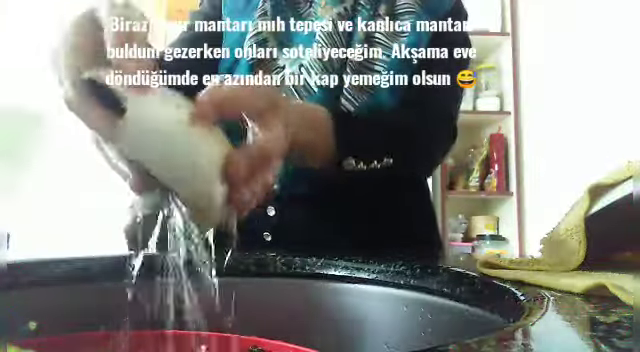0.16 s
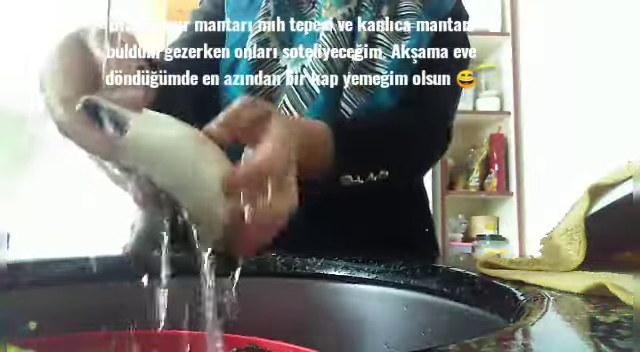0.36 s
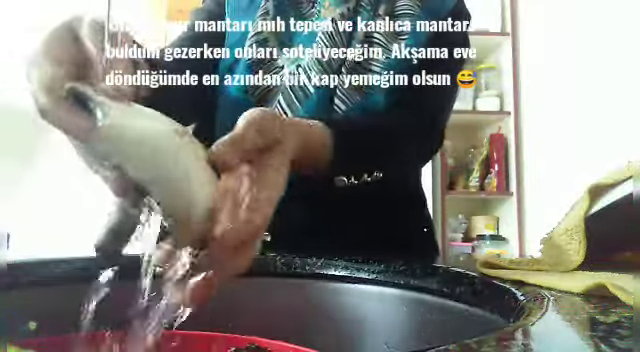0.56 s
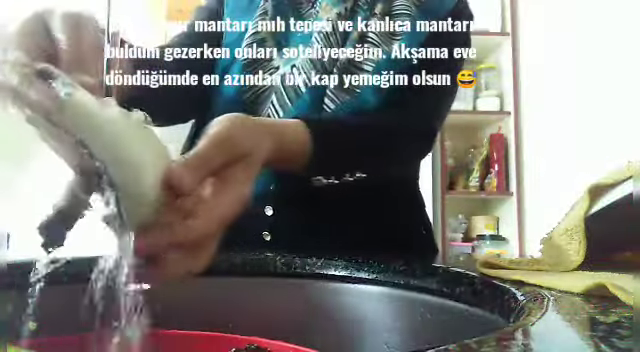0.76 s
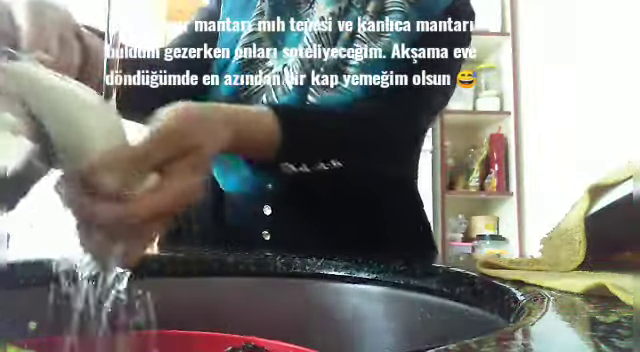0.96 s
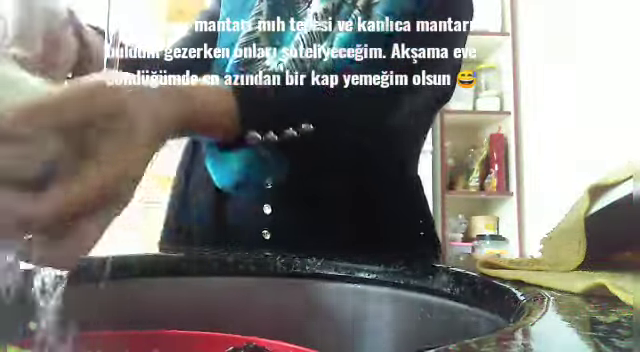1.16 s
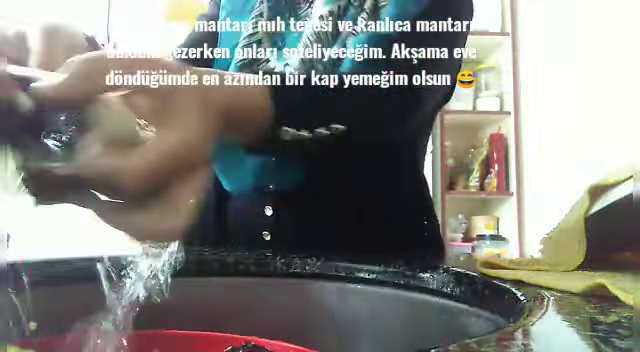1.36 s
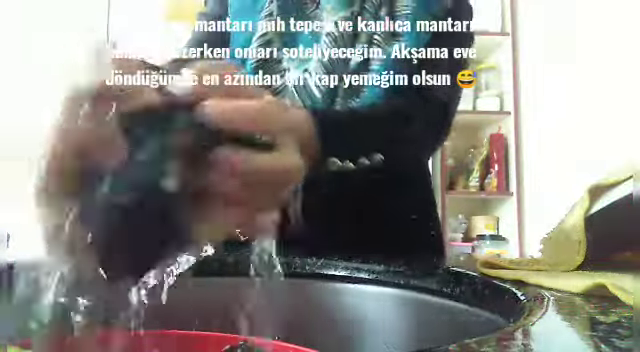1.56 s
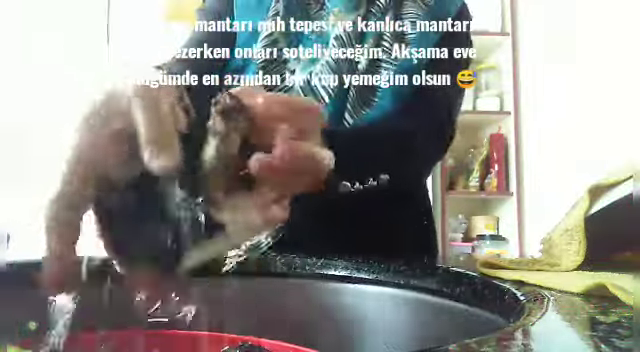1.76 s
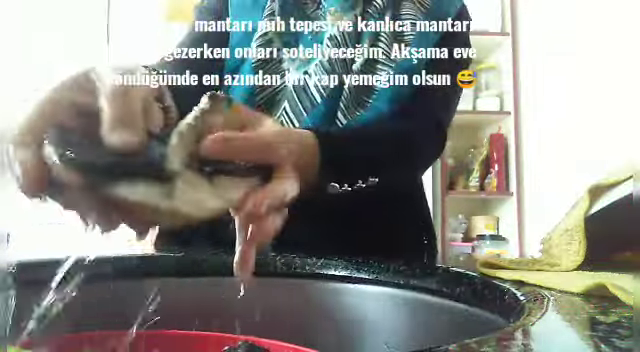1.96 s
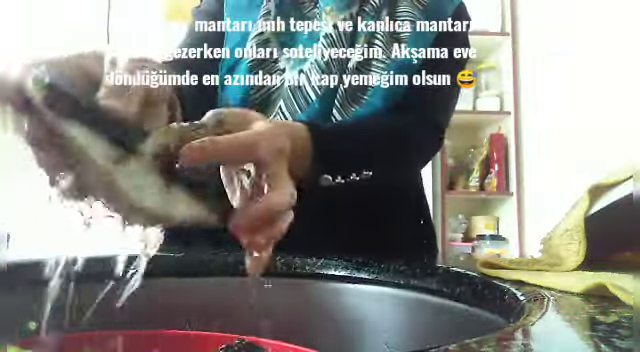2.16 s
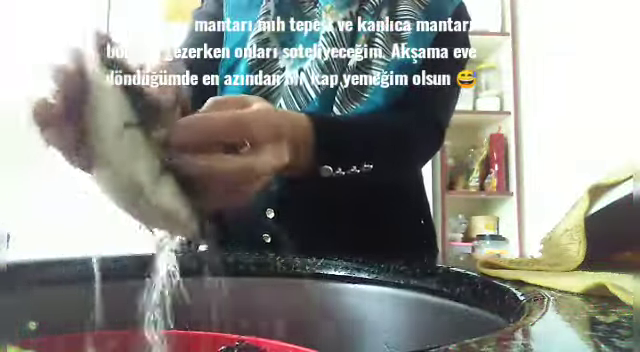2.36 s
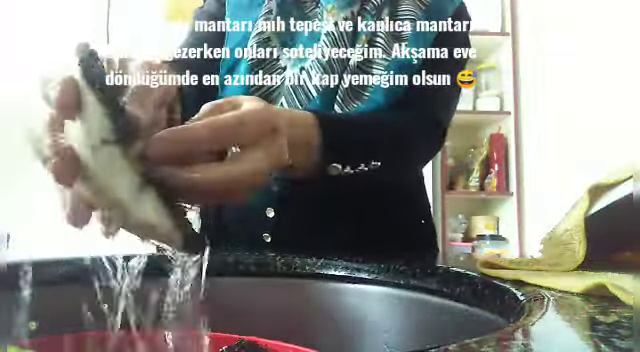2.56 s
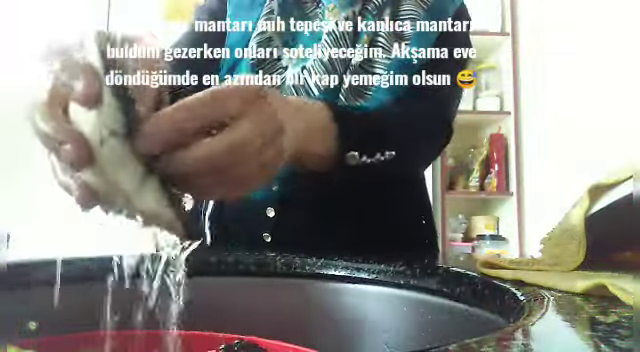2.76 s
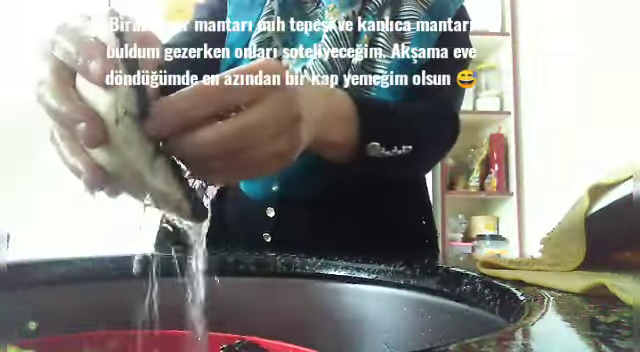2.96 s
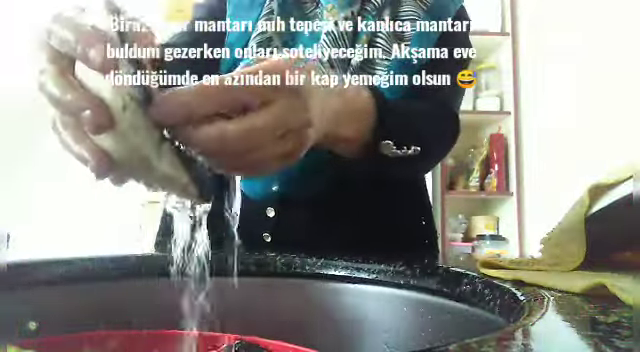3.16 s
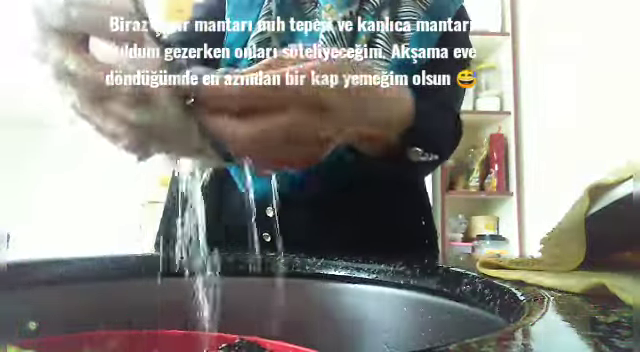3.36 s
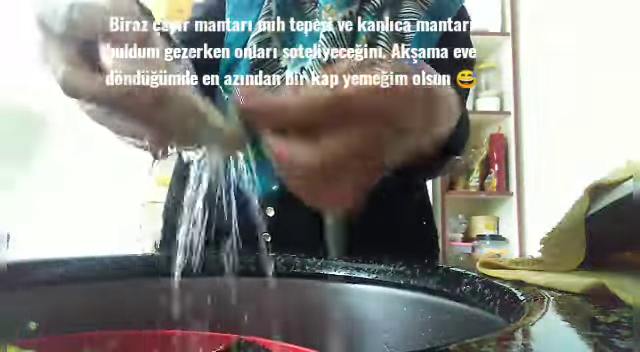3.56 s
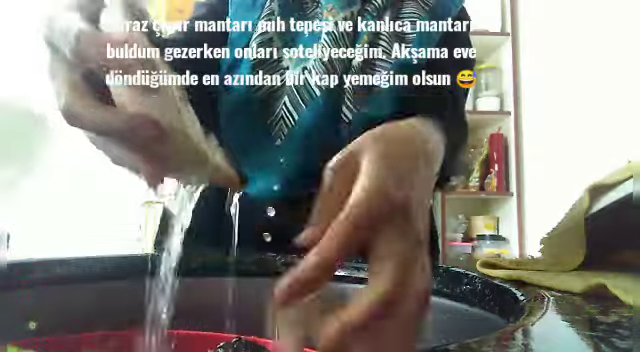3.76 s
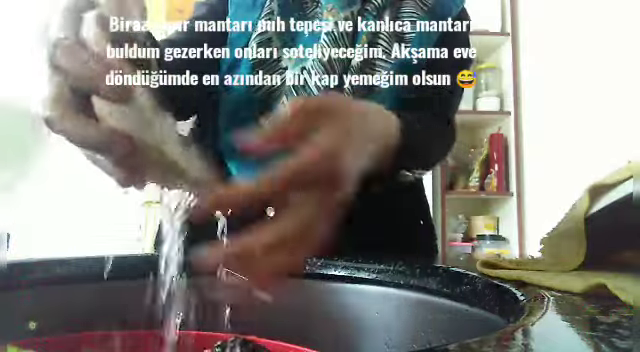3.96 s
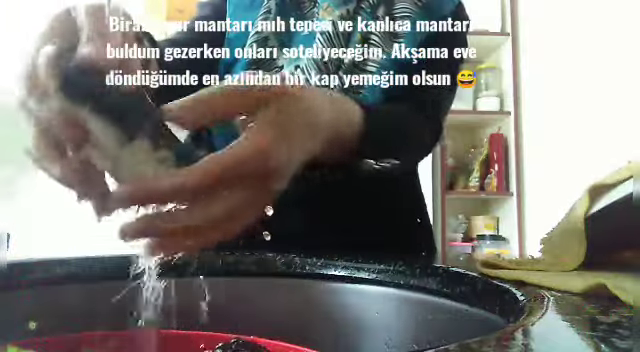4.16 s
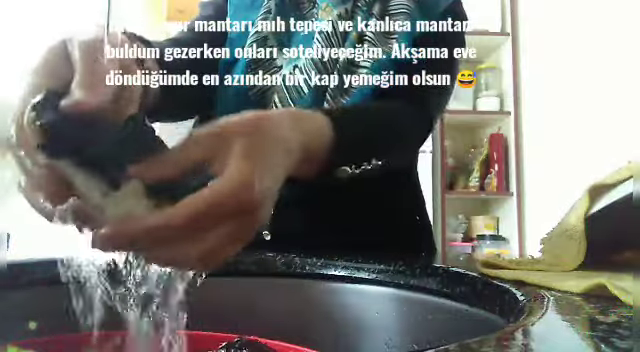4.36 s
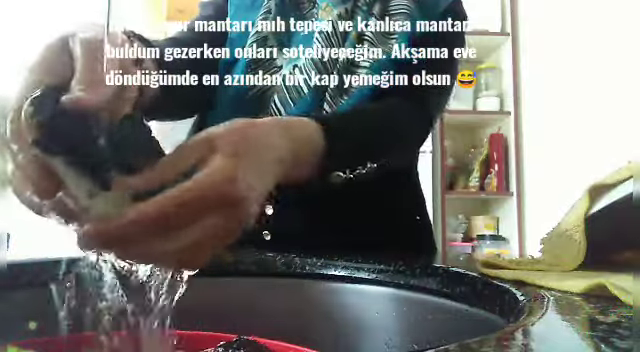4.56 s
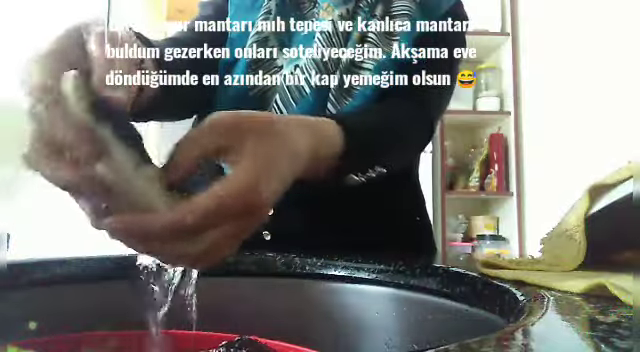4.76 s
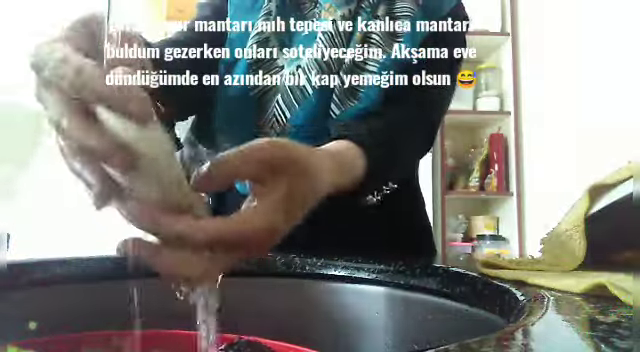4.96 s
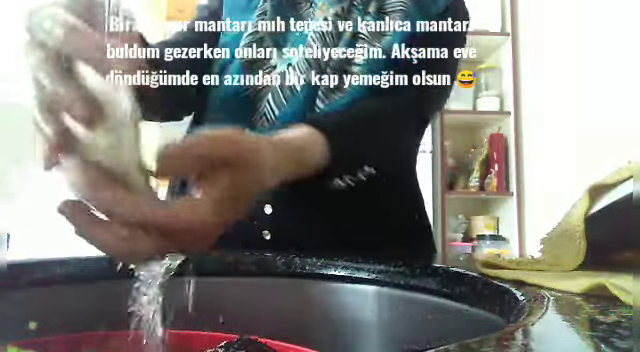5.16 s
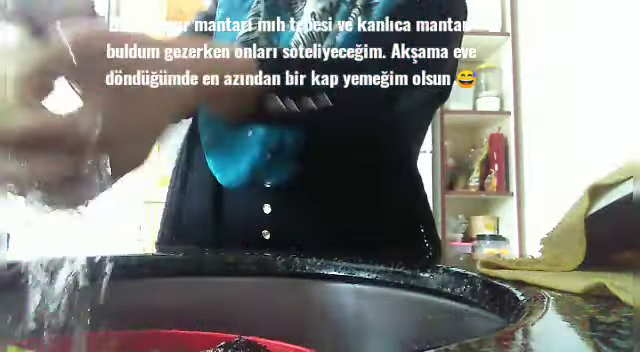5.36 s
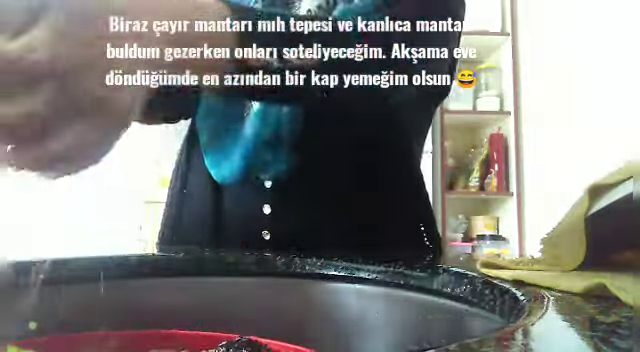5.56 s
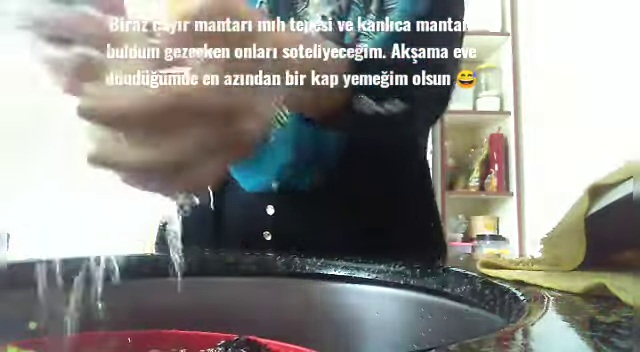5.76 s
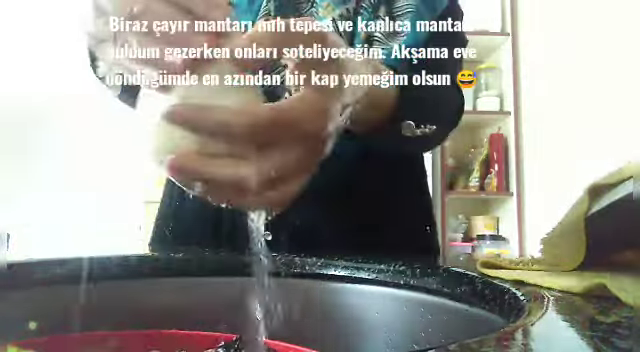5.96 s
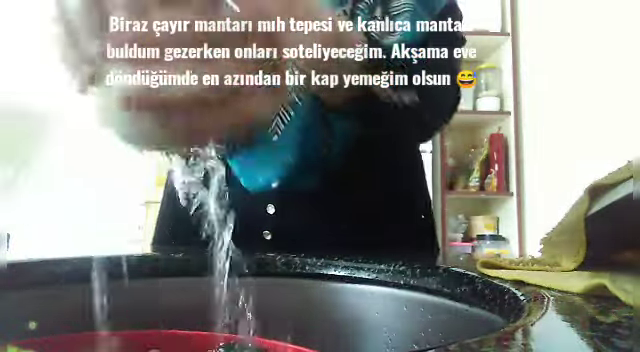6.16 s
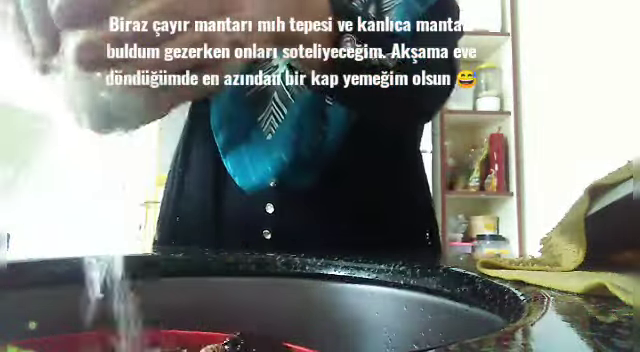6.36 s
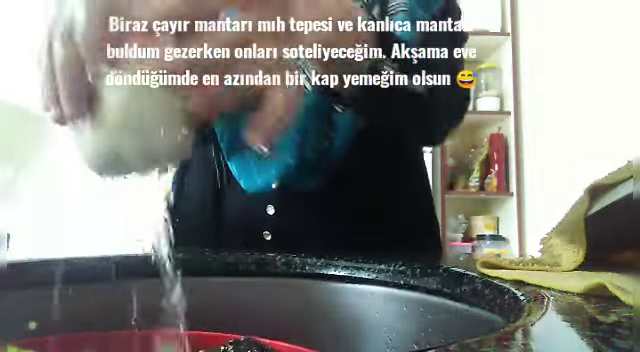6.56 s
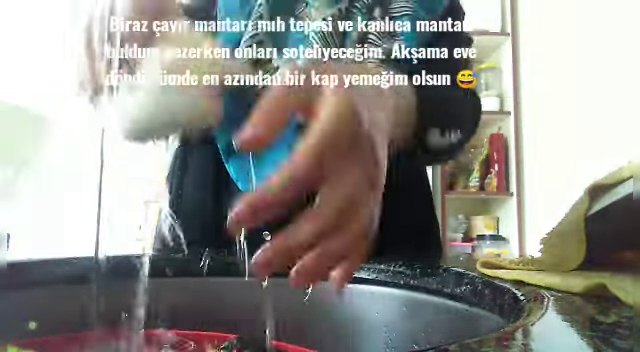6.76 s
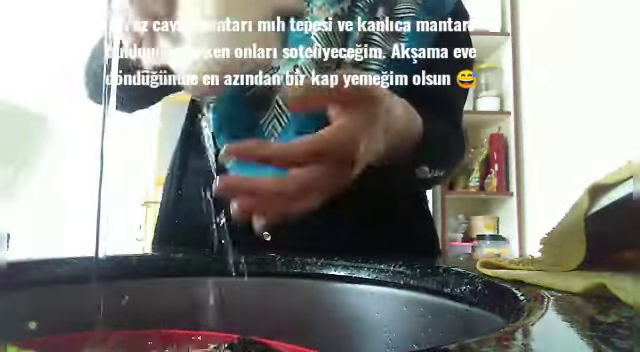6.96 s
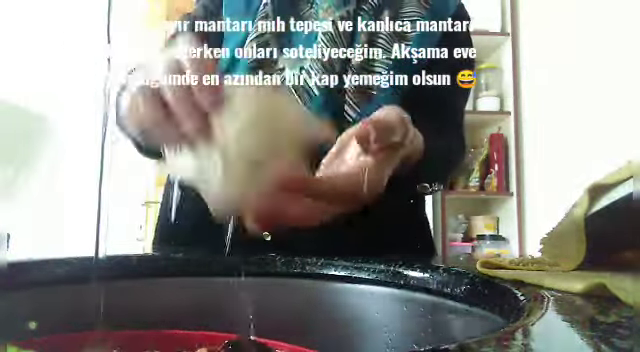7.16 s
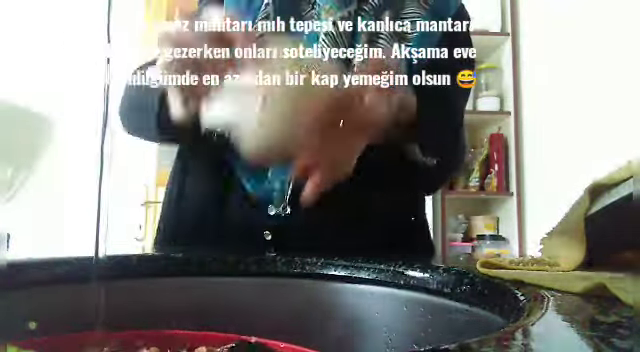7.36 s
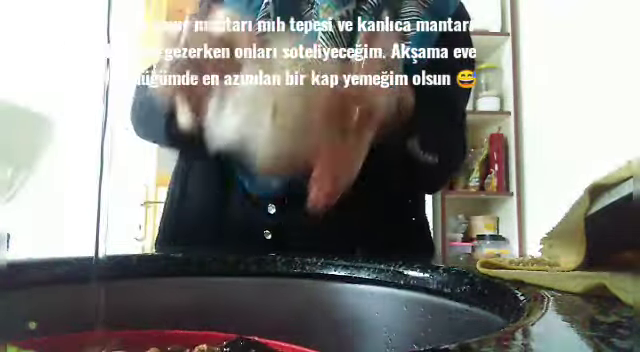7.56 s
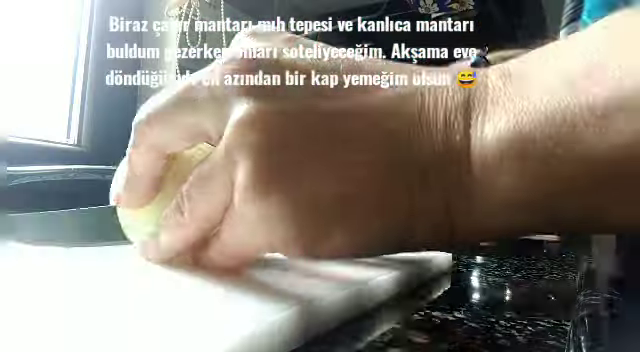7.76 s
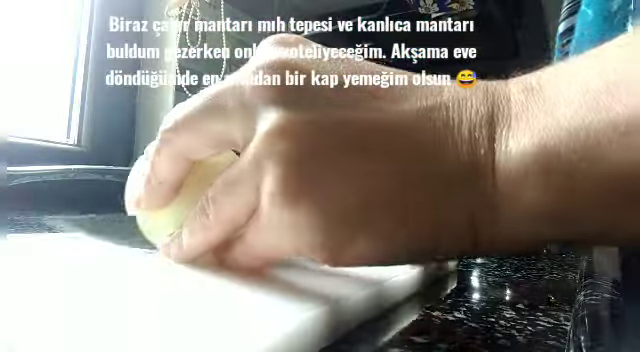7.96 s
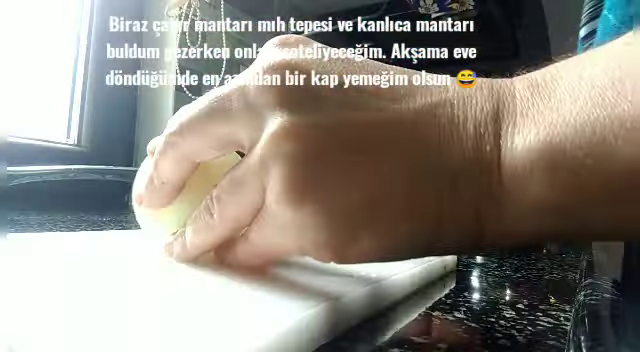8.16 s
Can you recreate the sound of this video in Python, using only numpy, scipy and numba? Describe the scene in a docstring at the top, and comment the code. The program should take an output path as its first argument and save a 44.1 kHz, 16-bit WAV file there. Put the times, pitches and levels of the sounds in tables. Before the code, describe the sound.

A kitchen tap runs over a mushroom being rinsed by hand above a bowl in the sink. Fine hissing spray and pattering run-off are broken by sharp splats, fat drops and ringing bubble plops, busiest around four seconds and again before seven. The flow then thins to drips and stops, leaving a very faint moist knife cut over a low thrum. Close stereo microphone, small room.

```python
"""In a kitchen sink, tap water runs over a mushroom turned in the hands and falls into a bowl.
The jet sprays and the run-off patters, as showers of tiny chirps over noise; the bowl drums in low noise.
Gouts, lumps and drops are bursts of band noise; trapped bubbles are dying sines; sink and kitchen ring on.
The flow dies away, and a knife starts to slice a vegetable: grainy noise and snaps over a soft low thrum."""
import sys
import numpy as np
from scipy import signal
from scipy.fft import rfft, irfft, next_fast_len
from scipy.io import wavfile
from scipy.ndimage import uniform_filter1d
from numba import njit

SR = 44100
rng = np.random.default_rng(int(sys.argv[2]) if len(sys.argv) > 2 else 0)


def log_audio(samples):
    """Write samples as a 16-bit WAV file to the path given in sys.argv[1]."""
    # one column per channel
    frames = np.atleast_2d(samples).T
    # limit to full scale, then quantise
    limited = np.clip(frames, -1, 1)
    pcm = np.round(limited * 32767).astype(np.int16)
    wavfile.write(sys.argv[1], SR, pcm)


N = 361619
TIME = np.arange(N) / SR
SPLAT_T60_S = 0.064  # decay of stray splashes and of a middling gout


def undb(db):
    """Decibels to gain."""
    return np.exp(np.asarray(db) * (np.log(10) / 20))


def unit(x):
    """Scale to rms 1."""
    return x / np.sqrt(np.mean(x ** 2) + 1e-18)


def curves(table):
    """The columns of a timed table, drawn as straight lines sample by sample."""
    seconds, *columns = np.transpose(table)
    return [np.interp(TIME, seconds, column) for column in columns]


def fade(t, t60):
    """Exponential decay that loses 60 dB in t60 seconds."""
    return np.exp(-np.log(1000) * t / t60)


def gains(points, size):
    """A (Hz, dB) curve as gains on the bins of a transform, interpolated over log frequency."""
    hz, db = np.transpose(points)
    bin_hz = np.fft.rfftfreq(size, 1 / SR) + 1
    return undb(np.interp(np.log(bin_hz), np.log(hz), db))


def colour(x, points):
    """Equalise a sound with a (Hz, dB) curve."""
    size = next_fast_len(x.shape[-1] + 2048)
    return irfft(rfft(x, size) * gains(points, size), size)[..., :x.shape[-1]]


def octave_band(x, hz, octaves):
    """A smooth band round hz, its spread given in octaves, tilted down towards the treble."""
    f = np.fft.rfftfreq(x.shape[-1], 1 / SR) + 1
    bell = np.exp(-.5 * (np.log2(f / hz) / octaves) ** 2)
    return irfft(rfft(x) * bell / np.sqrt(1 + f / hz), x.shape[-1])


def add(out, s, sound):
    """Mix a short sound in at s seconds."""
    i = int(np.clip(s * SR, 0, N - 1))
    out[..., i:i + sound.shape[-1]] += sound[..., :N - i]


def walk(rate):
    """Random drift with a spread near 1, heading for a new value rate times a second."""
    knots = rng.standard_normal(4096)
    return np.interp(TIME * rate, np.arange(len(knots)), knots)


def stereo(mid, side, width):
    """Left and right from a shared and an opposed part, at constant power."""
    return np.array([mid + width * side, mid - width * side]) / np.sqrt(1 + width ** 2)


@njit
def ring(out_size, start, hz, cycles, size, skew, glide):
    """Each grain is a dying sine that rises in pitch; its place shifts the phase between the two ears."""
    out = np.zeros((2, out_size))
    for k in range(len(start)):
        length = int(cycles[k] * SR / hz[k]) + 2
        step = 2 * np.pi * hz[k] / SR
        pole = np.exp(1j * step - 6 / length)
        chirp = np.exp(1j * step * glide / length)
        z = size[k] + 0j
        ear = np.exp(1j * skew[k])
        for j in range(min(length, out_size - start[k])):
            z = z * pole
            pole = pole * chirp
            onset = min((j + 1) * step / 3, 1.)  # about half a cycle of fade-in
            out[0, start[k] + j] += onset * (z * ear.conjugate()).imag
            out[1, start[k] + j] += onset * (z * ear).imag
    return out


def grains(count, low_hz, high_hz, cycles, spread_db, glide=0.13):
    """A shower of chirps of random pitch, length and size; a positive spread makes few big ones."""
    when, pitch, life, big, place = rng.random((count, 5)).T
    hz = np.minimum(low_hz + (high_hz - low_hz) * pitch, SR / 3)
    size = undb(-spread_db * np.log(.025 + big)) * np.sqrt(hz)
    skew = (2 * place - 1) * np.minimum(hz / 3500, np.pi / 2)
    start = (when * N).astype(np.int64)
    lengths = cycles * (0.19 + 4.5 * life)
    return unit(ring(N, start, hz, lengths, size, skew, float(glide)))


def burst(hz, octaves, t60, rough, rise_s):
    """A sudden cluster of tiny impacts: clumpy noise in a band round hz, wider in stereo when high."""
    t = np.arange(SR // 4) / SR
    mid, side = octave_band(rng.standard_normal((2, len(t))), hz, octaves)
    cluster = stereo(mid, side, min(hz / 4000, 1))
    # a gout carries a set amount of water, so its power is evened out before it is shaped
    power = uniform_filter1d(np.mean(cluster ** 2, axis=0), size=int(SR / hz * 4) + 150)
    cluster /= np.sqrt(power + 1e-12)
    clumps = np.exp(rough * unit(uniform_filter1d(rng.standard_normal(len(t)), size=70)))
    return cluster * clumps * (1 - np.exp(-t / rise_s)) * fade(t, t60)


def bursts(table, rough, rise_s):
    """Play bursts listed by start in seconds, level in dB, centre in Hz, octaves and t60 in seconds."""
    out = np.zeros((2, N))
    for s, db, hz, octaves, t60 in table:
        add(out, s, undb(db) * burst(hz, octaves, t60, rough, rise_s))
    return out


def bubble(hz, cycles, glide=0.03, apart_hz=2900, swell_cycles=2.2):
    """A trapped bubble swells into its ring, sharpens as it rises and loses 60 dB in so many cycles."""
    t = np.arange(SR // 6) / SR
    t60 = cycles / hz
    pitch = hz * (1 + glide * (np.minimum(t / t60, 1) - .2))
    phase = 2 * np.pi * np.cumsum(pitch) / SR
    shape = fade(t, t60) * (1 - np.exp(-t * hz / swell_cycles))
    skew = np.array([[-1], [1]]) * min(hz / apart_hz, .5)  # high ones reach the ears more out of step
    return shape / shape.max() * np.sin(phase + skew)


def thrum(note_hz=77, rumble_db=-9, rumble_hz=105):
    """A soft low sine that wavers in pitch and strength, blurred by rumble."""
    # Swell of the thrum. Each row: time in seconds, level in dB.
    thrum_level = [(7.77, -95), (7.81, -81), (7.87, -72), (7.98, -72), (8.025, -60), (8.11, -62),
                   (8.16, -76), (8.2, -65)]
    phase = 2 * np.pi * np.cumsum(note_hz * (1 + .05 * walk(25))) / SR
    note = np.sqrt(2) * np.sin(phase) * undb(walk(20))
    rumble = unit(octave_band(rng.standard_normal(N), rumble_hz, octaves=0.67))
    return (note + undb(rumble_db) * rumble) * undb(curves(thrum_level)[0])


def knife(slide_db=2):
    """The blade slides through wet flesh with a soft hiss, bursting cells, with a few sharper snaps."""
    # Strokes of the blade in the vegetable. Each row: time in seconds, crunch level in dB.
    cut_level = [(7.77, -101), (7.795, -64), (7.85, -69.5), (7.925, -72.5), (7.945, -57), (8.0, -56),
                 (8.05, -60.5), (8.1, -62.5), (8.135, -59), (8.2, -71)]
    # Tone of the crunch. Each row: frequency in Hz, gain in dB.
    crunch_tone = [(250, -19.5), (500, -25.5), (850, -6), (1400, -6), (2200, -1), (4000, -3), (7000, -5),
                   (10000, -21.5), (14000, -30)]
    # Skin and fibres snapping. Each row: start in seconds, level in dB, centre in Hz, spread in octaves,
    # t60 in seconds.
    fibre_snaps = [(7.939, -54.5, 1820, 1.5, 0.099), (8.03, -54, 5100, 1.3, 0.017),
                   (8.063, -54, 2200, 0.8, 0.033)]
    cells = grains(count=24000, low_hz=283, high_hz=12800, cycles=2.0, spread_db=-1.0)
    slide = undb(slide_db) * rng.standard_normal((2, N))
    crunch = unit(colour(cells + slide, crunch_tone)) * undb(curves(cut_level)[0])
    return crunch + bursts(fibre_snaps, rough=0.2, rise_s=0.00022)


def thuds():
    """Lumps of water sound the hollow of the bowl as low bursts; knocks on the basin go deeper."""
    # Heavy lumps landing on the bowl. Each row: start in seconds, level in dB, centre in Hz.
    lumps = [(0.131, -35.5, 470), (0.826, -42.5, 560), (2.122, -39.5, 484), (2.481, -51, 450),
             (3.192, -35.5, 560), (3.345, -34, 480), (3.901, -31.5, 440), (4.195, -36, 480),
             (4.409, -47.5, 330), (4.855, -46.5, 400), (5.084, -36.5, 390), (5.485, -42, 580),
             (5.739, -38, 500), (6.801, -27.5, 500), (6.886, -32, 520), (6.906, -34.5, 520),
             (7.15, -44, 520), (7.477, -46.5, 450), (7.576, -60.5, 480)]
    # Deep knocks on the basin. Each row: start in seconds, level in dB, centre in Hz, spread in octaves,
    # t60 in seconds.
    knocks = [(2.985, -39.5, 152, 0.6, 0.19), (3.9, -53, 70, 1.0, 0.4), (4.671, -53.5, 136, 0.32, 0.3)]
    octaves, t60_s = 0.48, 0.084
    rows = [(s, db, hz, octaves, t60_s) for s, db, hz in lumps]
    return bursts(rows + knocks, rough=0.25, rise_s=0.0003)


def gurgles(gain_db=-1.0, offshoot_db=-2):
    """A thick pour churns the pool: bubbles tumble round one hollow note, each shedding a higher one."""
    # Thick pours. Each row: start in seconds, length in seconds, bubble level in dB before gain_db,
    # centre pitch in Hz.
    pours = [(3.161, 0.055, -42.5, 607), (3.83, 0.15, -41.5, 510), (4.122, 0.12, -46, 490),
             (6.539, 0.12, -39.5, 476), (6.76, 0.11, -44, 564)]
    gap_s, scatter_octaves, scatter_db = .01, 0.098, 3  # between bubbles; spread of pitch and size
    life_cycles, offshoot_octaves = 19, 1.3
    out = np.zeros((2, N))
    for s, length, db, hz in pours:
        chance = rng.standard_normal((32, 4))
        for start, (late, pitch, big, split) in zip(np.arange(s, s + length, gap_s), chance):
            size = undb(db + gain_db + scatter_db * big)
            parent = bubble(hz * 2 ** (scatter_octaves * pitch), life_cycles)
            add(out, start + late * gap_s / 2, size * parent)
            offshoot = bubble(hz * 2 ** (offshoot_octaves + split / 2), 2 * life_cycles)
            add(out, start + (1 - late / 2) * gap_s, size * undb(offshoot_db) * offshoot)
    return out


def plops(gain_db=2.5):
    """Single air bubbles trapped by the falling water ring out above the stream."""
    # Trapped bubbles. Each row: start in seconds, level in dB before gain_db, pitch in Hz,
    # cycles to lose 60 dB.
    trapped = [(0.114, -22.5, 1125, 24), (.1665, -23.5, 2200, 27), (1.6277, -36, 1213, 26),
               (2.482, -35, 890, 17), (3.0655, -37.5, 610, 26), (3.192, -33.5, 1480, 34),
               (3.7765, -33, 1330, 61), (3.8225, -36.5, 440, 18), (3.825, -33, 586, 21),
               (3.9305, -32.5, 610, 16), (3.951, -32.5, 1300, 50), (3.968, -33.5, 420, 11),
               (4.0005, -17.5, 1568, 33), (4.002, -27.5, 2110, 84), (4.104, -37, 633, 30),
               (4.107, -28, 2200, 62), (4.133, -42.5, 450, 13), (4.1695, -24, 449, 11),
               (4.194, -35, 940, 20), (4.4055, -32.5, 698, 27), (4.4932, -34, 1155, 30),
               (4.594, -44, 857, 34), (4.856, -35, 843, 37), (5.082, -32, 804, 16),
               (5.2141, -27.5, 1168, 21), (5.403, -44, 1440, 35), (5.747, -49, 455, 28),
               (5.998, -33, 2110, 25), (6.0895, -27.5, 840, 54), (6.502, -36.5, 877, 38),
               (6.598, -38, 480, 35), (6.632, -35, 442, 9), (6.6625, -29.5, 1290, 37),
               (6.692, -31.5, 966, 30), (6.7295, -24, 595, 61), (6.799, -15.5, 1990, 37),
               (6.8845, -29, 576, 18), (6.906, -37, 1640, 90), (6.909, -27.5, 546, 15),
               (6.927, -31, 568, 18)]
    out = np.zeros((2, N))
    for s, db, hz, cycles in trapped:
        add(out, s, undb(db + gain_db) * bubble(hz, cycles))
    return out


def splats(middling_db=-30.5, halving_db=38.5, tap_octaves=0.41, tap_t60_s=0.013):
    """Gouts slap the bowl, a compact one hard and short, a loose one soft and long; single drops tap."""
    # Gouts hitting the bowl. Each row: start in seconds, level in dB, centre in Hz, spread in octaves.
    gout_hits = [(0.113, -37, 1260, 1.7), (0.119, -26.5, 3480, 2.4), (.1665, -36, 2160, 0.71),
                 (0.185, -33.5, 1820, 0.81), (0.4718, -36.5, 6450, 0.69), (0.497, -28, 7900, 0.42),
                 (0.531, -36, 2280, 2.1), (.764, -34, 3000, 0.17), (0.7988, -29, 4070, 0.25),
                 (0.825, -32.5, 4540, 0.8), (1.108, -34.5, 5840, 0.3), (1.161, -36, 4560, 0.22),
                 (1.3733, -22, 6240, 0.58), (1.404, -35, 4500, 0.12), (1.431, -33.5, 4400, 0.47),
                 (1.676, -28.5, 5900, 0.7), (1.696, -31.5, 3950, 0.16), (1.8338, -40, 3480, 0.63),
                 (2.1164, -36.5, 2880, 0.91), (2.355, -33, 7300, 0.34), (2.4591, -33, 3450, 1.26),
                 (2.643, -36.5, 3100, 0.13), (2.717, -28, 2900, 0.23), (2.733, -28, 7100, 0.25),
                 (2.759, -34, 6040, 0.4), (3.007, -37, 1380, 0.11), (3.126, -37, 4030, 1.1),
                 (3.19, -41, 1880, 1.2), (3.205, -27, 5530, 0.37), (3.226, -30.5, 2980, 0.75),
                 (3.345, -30, 1660, 1.4), (3.396, -40, 3550, .4), (3.4068, -31.5, 4340, 0.68),
                 (3.7877, -29.5, 3670, 0.16), (3.8217, -32.5, 5060, 0.51), (3.88, -26, 4500, 1.8),
                 (3.983, -22.5, 3900, 0.6), (4.009, -28, 3400, 0.88), (4.04, -31.5, 2400, 0.5),
                 (4.048, -24.5, 3300, 0.35), (4.106, -19.5, 5100, 0.51), (4.193, -35.5, 2120, 1.2),
                 (4.22, -30, 2970, 0.36), (4.258, -36, 1300, 0.33), (4.496, -30.5, 2820, 1.1),
                 (4.587, -34, 6400, 0.36), (4.778, -31, 3700, 0.041), (4.8545, -26.5, 1030, .4),
                 (4.872, -32, 2060, 0.54), (4.9137, -26.5, 3540, 0.56), (5.0186, -35.5, 2600, 1.5),
                 (5.0356, -29.5, 3500, 0.78), (5.08, -40, 1120, 0.28), (5.2155, -31.5, 2420, 1.7),
                 (5.346, -32.5, 2530, 0.67), (5.385, -37.5, 2400, 0.49), (5.51, -34.5, 6140, 0.42),
                 (5.548, -33, 3760, .2), (5.6965, -23, 4400, 0.71), (5.7254, -28, 2960, .35),
                 (5.739, -27, 3100, 1.9), (5.821, -33.5, 2900, 0.38), (6.05, -38.5, 1920, 0.63),
                 (6.089, -29, 1020, 1.8), (6.275, -25.5, 3900, 0.85), (6.35, -26, 3420, 0.26),
                 (6.4758, -28.5, 2420, 0.98), (6.5208, -31, 2600, 0.35), (6.5442, -29.5, 3680, 0.36),
                 (6.585, -26, 4640, 0.82), (6.653, -23, 4340, 0.82), (6.724, -25, 2160, 1.4),
                 (6.735, -25, 1540, 0.84), (6.8008, -19.5, 2740, 1.75), (6.917, -36, 6700, 0.55),
                 (7.119, -44, 7200, 0.6), (7.426, -55, 3840, 0.11)]
    # Fat drops tapping the bare bowl. Each row: start in seconds, level in dB, centre in Hz.
    drop_taps = [(0.457, -32.5, 700), (1.03, -37.5, 965), (1.168, -40, 790), (2.954, -28, 1000),
                 (3.2762, -24, 6360), (3.3446, -18, 1320), (3.475, -24.5, 1130), (3.777, -20, 1350),
                 (3.8686, -20, 1020), (4.3022, -20.5, 1260), (5.216, -30, 1170), (6.112, -30.5, 2750),
                 (6.8845, -27.5, 640), (7.378, -58, 1100), (7.517, -51, 2390), (7.688, -56, 3500)]
    rows = []
    for s, db, hz, octaves in gout_hits:
        t60 = SPLAT_T60_S * 2 ** ((middling_db - db) / halving_db)  # halves with every halving_db more
        rows.append((s, db, hz, octaves, t60))
    for s, db, hz in drop_taps:
        rows.append((s, db, hz, tap_octaves, tap_t60_s))
    return bursts(rows, rough=.2, rise_s=.0005)


def spatter(count, low_hz=2700, high_hz=9500, octaves=0.16, spread_db=3):
    """Stray small splashes at random times, each a brief spit of its own pitch."""
    rows = []
    for when, pitch, big in rng.random((count, 3)):
        db = -spread_db * np.log(0.15 + big)
        rows.append((when * N / SR, db, low_hz + pitch * (high_hz - low_hz), octaves, SPLAT_T60_S))
    return bursts(rows, rough=.2, rise_s=.003)


def spills(rise_s=0.024, fall_s=0.03):
    """Power of spray and run-off from spilling handfuls: each gathers quickly and drains a bit slower."""
    # Handfuls that spill off the mushroom and swell the stream. Each row: time of the height in seconds,
    # spray in dB, run-off in dB, both before the stream's trims.
    handfuls = [(0.166, -38, -40), (.82, -39.5, -48.5), (1.09, -42.5, -48.5), (1.423, -37.5, -49),
                (1.62, -39, -49), (1.71, -40.5, -45.5), (2.487, -42, -41), (3.0, -42, -41),
                (3.209, -31.5, -47), (4.03, -36.5, -51), (4.447, -39.5, -40), (4.777, -39.5, -66),
                (4.899, -42.5, -43.5), (5.092, -39.5, -45), (5.356, -38, -56), (5.53, -42, -64),
                (5.733, -35.5, -43), (6.07, -39, -51), (6.23, -35, -41.5), (6.62, -34, -57),
                (6.82, -36, -52), (6.91, -39.5, -43), (7.13, -43.5, -53)]
    power = np.zeros((2, N))
    t = np.arange(-SR // 5, SR // 3) / SR
    shape = np.exp(-(t / np.where(t < 0, rise_s, fall_s)) ** 2 / 2)
    for s, spray_db, runoff_db in handfuls:
        power += undb([[spray_db], [runoff_db]]) ** 2 * np.interp(TIME, s + t, shape)
    return power


def flow(spray_db=-1, runoff_db=-1):
    """Levels of spray, patter and drumming in dB: the steady stream plus the spills."""
    # The steady stream, heaviest when the hands let it straight through. Each row: time in seconds,
    # spray in dB, run-off in dB, both before the trims.
    steady = [(0.0, -39, -46.5), (0.35, -42.5, -48), (1.6, -43.5, -52), (2.0, -43, -52), (2.28, -46, -51),
              (2.7, -39, -49), (3.25, -43, -44), (3.6, -38.5, -46.5), (3.85, -33, -39), (4.15, -36.5, -38),
              (4.4, -42, -49.5), (5.45, -45.5, -49), (5.8, -38.5, -47.5), (6.38, -41, -47),
              (6.52, -31, -42), (6.85, -37.5, -47.5), (7.0, -49, -53.5), (7.2, -49, -56.5),
              (7.63, -66, -71.5), (7.72, -75.5, -82), (7.85, -84.5, -105)]
    # the drumming follows the run-off but grows far less (dB per dB); below a trickle both fade together
    drum_db, drum_growth, trickle_db = -59.5, 0.37, -53
    steady_spray, steady_runoff = curves(steady)
    steady_power = undb([steady_spray + spray_db, steady_runoff + runoff_db]) ** 2
    spray, runoff = 10 * np.log10(steady_power + spills())
    above = runoff - trickle_db
    return spray, runoff, drum_db + np.minimum(above, drum_growth * above)


def wander(x, centres, db, rate):
    """Neighbouring bands swell and sink on their own as the water shifts about."""
    size = next_fast_len(N)
    spectrum = rfft(x, size)
    pitch = np.log(np.fft.rfftfreq(size, 1 / SR) + 1)
    out = np.zeros((2, N))
    for row in np.eye(len(centres)):
        share = np.interp(pitch, np.log(centres), row)
        out += irfft(spectrum * share, size)[:, :N] * undb(db * walk(rate))
    return out


def stream(spray_db=-4, patter_db=-5, drum_db=-2, mist_db=-2, rush_db=-3, spatter_db=-2,
           flutter_db=3.0, flurry_db=3.5, trickle_spray_db=-49):
    """The jet breaks into fine spray on the hands, only hissing when weak; run-off patters and drums."""
    # Tone of the fine spray, the falling run-off and the drumming bowl.
    # Each row: frequency in Hz, gain in dB.
    spray_tone = [(300, -32.5), (900, -8.5), (1800, -12.5), (2900, -2), (4800, -2.5), (6600, -0.5),
                  (8200, -3.5), (11000, -12), (14500, -10)]
    patter_tone = [(50, -20.5), (150, -7.5), (300, -2), (480, 1.5), (640, 6), (1200, -0.5), (2100, 1),
                   (3200, -33), (6000, -32.5)]
    drum_tone = [(20, -17), (45, -10.5), (85, -5.5), (122, 3.5), (155, -10), (215, -1.5), (300, -3.5),
                 (500, -22)]
    spray_level, patter_level, drum_level = flow()
    flutter = flutter_db * walk(40)  # the stream necks and breaks unevenly
    mist, rush = rng.standard_normal((2, 2, N))  # drops too small and too many to hear singly

    droplets = grains(count=30000, low_hz=1545, high_hz=14070, cycles=40, spread_db=4.0)
    breakup = 1 / (1 + undb(trickle_spray_db - spray_level) ** 2)  # 1 in full flow, 0 in a trickle
    flurries = undb(flurry_db * walk(28))  # droplets fly off in clumps
    hiss = np.sqrt(2 - breakup) * undb(mist_db) * mist
    spray = unit(colour(breakup * flurries * droplets + hiss, spray_tone))
    spray += undb(spatter_db) * breakup * spatter(count=120)

    drops = grains(count=10000, low_hz=284, high_hz=3516, cycles=4, spread_db=3.8)
    patter = unit(colour(drops + undb(rush_db) * stereo(*rush, width=1.0), patter_tone))
    drum = unit(colour(stereo(*rng.standard_normal((2, N)), width=0.67), drum_tone))

    water = spray * undb(spray_level + spray_db) + patter * undb(patter_level + patter_db)
    water = wander(water, np.geomspace(500, 12000, 8), db=2.5, rate=30)
    return water * undb(flutter) + drum * undb(drum_level + drum_db)


def hollow(x):
    """Echoes from the basin's wall cancel narrow bands of every splash."""
    # Bands that the basin swallows. Each row: centre in Hz, width in Hz, gain at the centre in dB.
    swallowed = [(382, 67, -4.5), (721, 110, -11), (1000, 260, -6.5), (1735, 290, -3)]
    for hz, width, db in swallowed:
        x = x + (undb(db) - 1) * signal.lfilter(*signal.iirpeak(hz, hz / width, fs=SR), x)
    return x


def sink(x, ring_db=-1.5):
    """The modes of sink and bowl, with a few steady bubble tones, ring on as dying sines after every impact."""
    # Rings after each impact: modes of sink and bowl, and from 850 to 1604 Hz the steady ring of bubbles. Each
    # row: pitch in Hz, t60 in seconds, resonant gain in dB before ring_db.
    modes = [(123, .35, -4), (208, .2, -3), (435, .13, -3), (475, .13, -2), (570, .14, -3), (612, .15, 1),
             (850, .08, -6), (1165, .05, -8), (1604, .05, -6), (2368, .05, -4), (2681, .05, -3),
             (3250, .06, -2), (3914, .06, -2), (4408, .07, 0), (5385, .07, -1), (6706, .04, -1)]
    t = np.arange(SR // 2) / SR
    response = np.zeros(len(t))
    for hz, t60, db in modes:
        level = undb(db) * 2 * np.log(1000) / (t60 * SR)  # so that a long ring is no louder at its pitch
        response += level * fade(t, t60) * np.sin(2 * np.pi * hz * t)
    return undb(ring_db) * signal.fftconvolve(x.mean(axis=0), response)[:N]


def reflections(x, t60, delay_s, db):
    """Dense echoes as dying noise; the bass reaches both ears nearly alike, the middle range does not."""
    t = np.arange(SR // 2) / SR
    mid, side = rng.standard_normal((2, len(t)))
    side = colour(side, [(200, -17.5), (700, 10.0), (2000, -1.0)])
    response = stereo(mid, side, 0.7) * fade(t, t60) * (t > delay_s)
    response /= np.sqrt(np.sum(response ** 2) / 2)
    return undb(db) * signal.fftconvolve(x, response, axes=1)[:, :N]


def thin_out(x):
    """In a lull one band of the low or middle range dips briefly."""
    # Lulls. Each row: centre in seconds, dip in dB, half length in seconds, band from Hz, band to Hz.
    lulls = [(1.727, -22, 0.014, 300, 2570), (3.406, -22, .013, 30, 380), (4.484, -31, 0.034, 30, 230),
             (4.49, -25, 0.031, 400, 660), (5.602, -20, 0.04, 696, 1680), (5.627, -13, 0.01, 30, 3060),
             (6.104, -18, 0.03, 30, 397), (6.325, -17, 0.01, 500, 2200), (6.527, -22.5, 0.026, 30, 365),
             (6.712, -5.5, 0.015, 30, 330), (6.868, -26.5, 0.018, 30, 330)]
    out = x.copy()
    for s, db, half_s, low_hz, high_hz in lulls:
        near = np.abs(TIME - s) < 3 * half_s
        band_pass = signal.butter(4, [low_hz, high_hz], "band", fs=SR, output="sos")
        band = signal.sosfiltfilt(band_pass, out)[:, near]
        depth = np.exp(-((TIME[near] - s) / half_s) ** 4 / 2)
        out[:, near] += band * (undb(db * depth) - 1)
    return out


def scene(bubble_coupling_db=-2.5):
    """Water in the sink, echoed by its walls and the kitchen, then the knife and the thrum."""
    impacts = hollow(stream() + splats() + thuds())
    bubbles = gurgles() + plops()
    shaking = impacts + undb(bubble_coupling_db) * bubbles  # bubbles shake the bowl less than impacts do
    water = impacts + bubbles + sink(shaking)
    basin = reflections(water, t60=.05, delay_s=.002, db=-10)
    kitchen = reflections(water, t60=0.22, delay_s=0.012, db=-13)
    return thin_out(water + basin + kitchen) + knife() + thrum()


def record(dry, left_lag_s=.00003, low_cut_hz=47, top_hz=14200):
    """Two ports of different colour, the left a little further away; deepest bass and top are cut."""
    # Colour of the two microphone ports. Each row: frequency in Hz, left minus right in dB.
    port_colour = [(150, 1.5), (450, 0.5), (850, -2.5), (1220, 3), (1550, -6), (1850, 2), (2250, -5),
                   (3400, -0.5), (5000, -0.5), (6300, 5), (8000, 0), (12000, -2)]
    size = next_fast_len(N + 2048)
    tilt = np.sqrt(gains(port_colour, size))  # half the difference goes to each side
    lag = np.exp(-2j * np.pi * np.fft.rfftfreq(size, 1 / SR) * left_lag_s)
    ports = irfft(rfft(dry, size) * np.array([tilt * lag, 1 / tilt]), size)[:, :N]
    ports = signal.sosfilt(signal.butter(2, low_cut_hz, "high", fs=SR, output="sos"), ports)
    return signal.sosfilt(signal.ellip(10, .2, 70, top_hz, fs=SR, output="sos"), ports)


dry = scene()
out = record(dry)
log_audio(out)
```